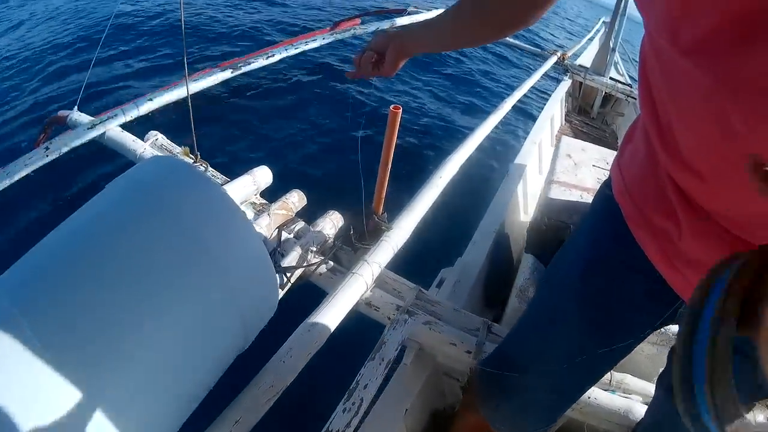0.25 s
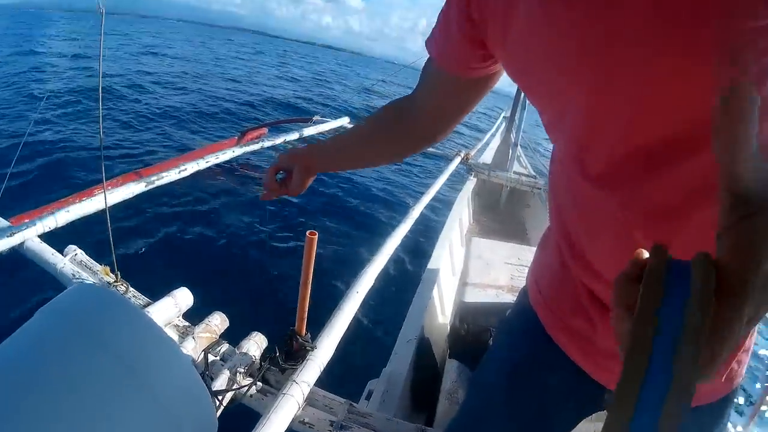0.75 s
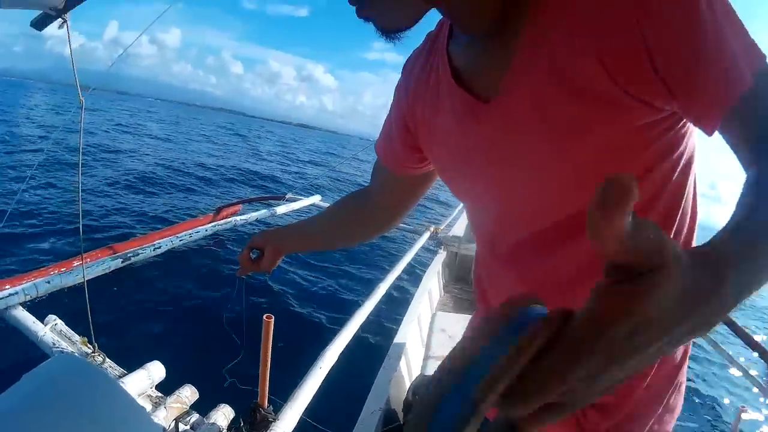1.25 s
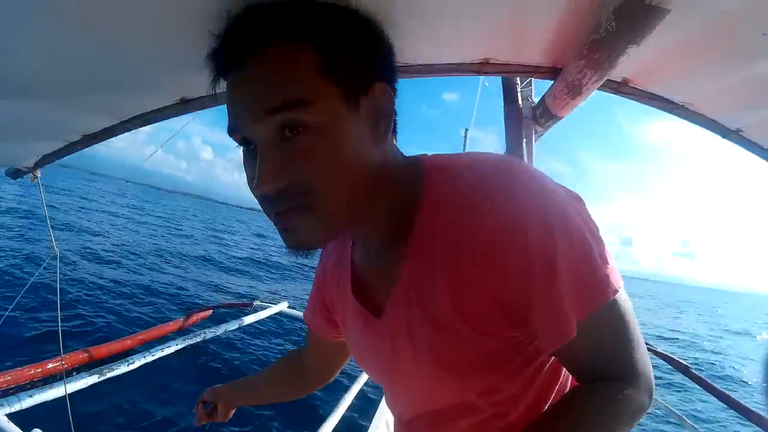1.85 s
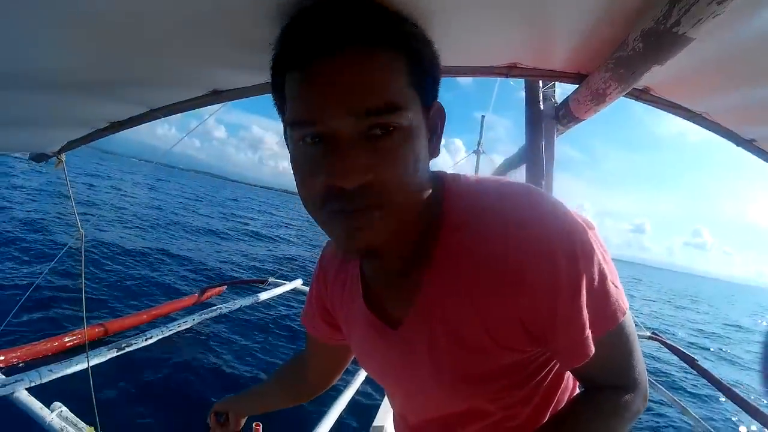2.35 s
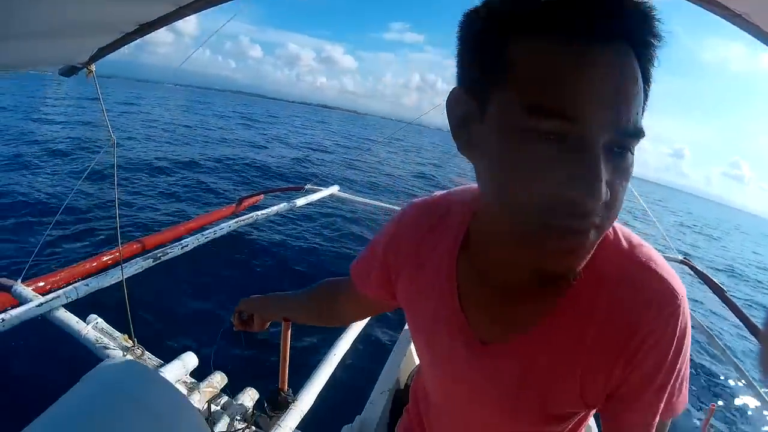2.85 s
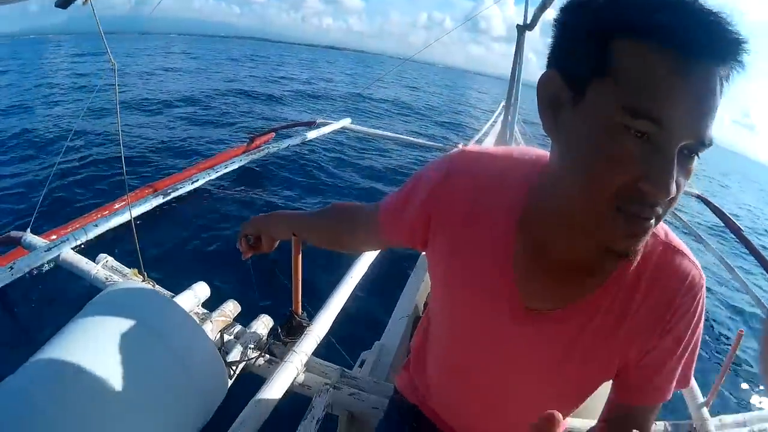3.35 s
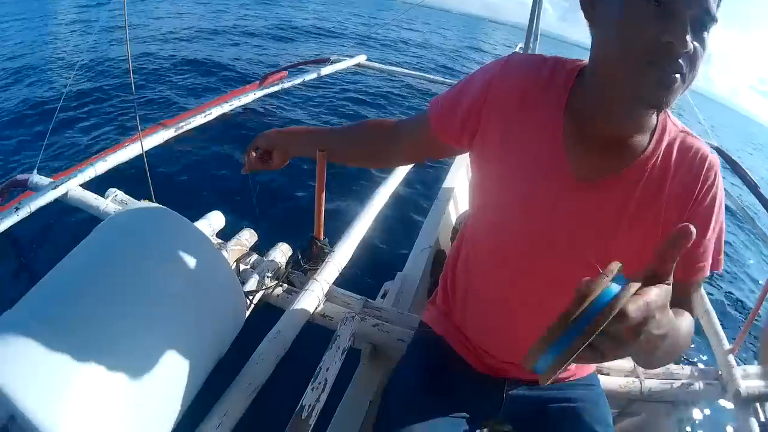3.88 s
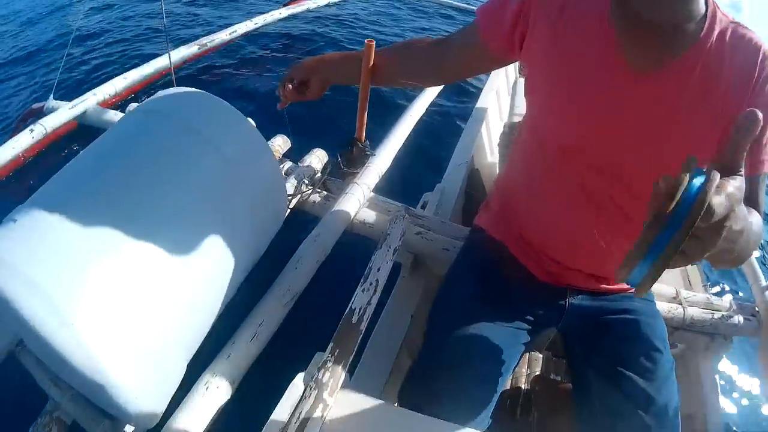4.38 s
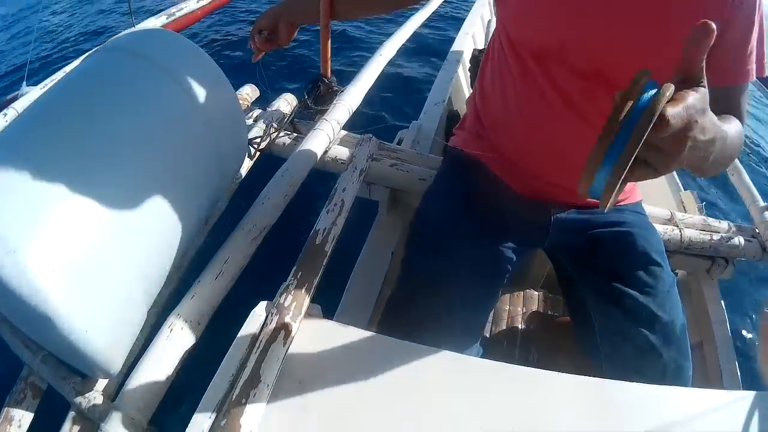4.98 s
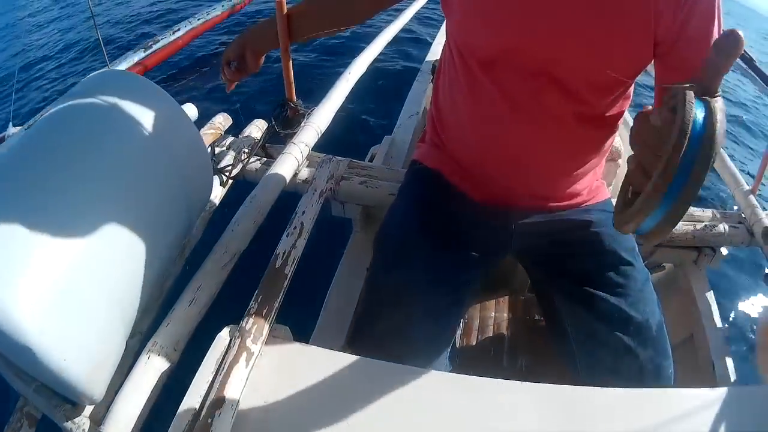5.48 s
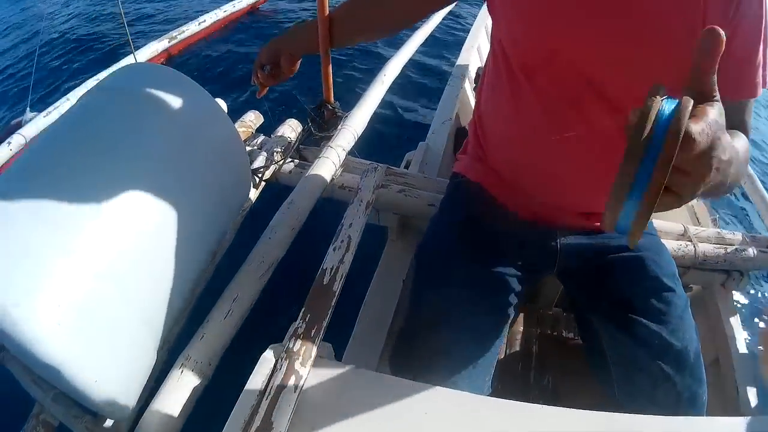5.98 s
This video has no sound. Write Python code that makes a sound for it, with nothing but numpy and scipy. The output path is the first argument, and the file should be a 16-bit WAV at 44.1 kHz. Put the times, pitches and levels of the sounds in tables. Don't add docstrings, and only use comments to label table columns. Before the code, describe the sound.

Wavelets slap and gurgle against a small wooden boat at sea, with two sharp knocks right beside the microphone early on.

```python
import sys
import numpy as np
from scipy import signal
from scipy.fft import rfft, irfft
from scipy.io import wavfile

SR = 44100
rng = np.random.default_rng(int(sys.argv[2]) if len(sys.argv) > 2 else 0)


def master_out(mix):
    frames = np.transpose(np.atleast_2d(mix))
    ceiling = np.clip(frames, -1, 1)
    pcm = np.round(ceiling * 32767).astype(np.int16)
    wavfile.write(sys.argv[1], SR, pcm)


def boost(x):
    u = np.asarray(x, float) / 20
    return 10 ** u


N = 274743


def rms_one(x):
    return x / np.sqrt(np.mean(x ** 2) + 1e-20)


def background():
    # (frequency [Hz], level [dB per Hz])
    density = [(12, -37), (20, -1.5), (116, -1), (172, -3), (337, -8), (607, -13), (923, -15),
               (1370, -18.5), (1910, -19), (3160, -22), (14300, -22.5), (16000, -27.5)]
    # (time [s], rumble level [dB])
    heave = [(0, -73), (1.25, -71.5), (1.8, -76.5), (2.4, -73.5), (3.5, -75.5), (5.47, -72), (6.23, -74.5)]
    crossover_hz, hiss_db = 200, -69.5
    hz = np.fft.rfftfreq(N, 1 / SR) + 1
    density_hz, density_db = np.transpose(density)
    colour = boost(np.interp(np.log(hz), np.log(density_hz), density_db))
    noise = rfft(rng.standard_normal(N)) * colour
    low_share = 1 / (1 + (hz / crossover_hz) ** 2)
    heave_db = np.interp(np.arange(N) / SR, *np.transpose(heave))
    rumble = rms_one(irfft(noise * low_share, N)) * boost(heave_db)
    hiss = rms_one(irfft(noise * (1 - low_share), N)) * boost(hiss_db)
    return rumble + hiss


def drift(rate_hz):
    step = 40
    r = np.exp(-2 * np.pi * step * rate_hz / SR)
    settle = 2000
    noise = rng.standard_normal(N // step + settle + 2)
    slow = signal.lfilter([1], [1, -2 * r, r * r], noise)[settle:]
    return np.interp(np.arange(N) / step, np.arange(len(slow)), rms_one(slow))


def grains(per_s, spread_db):
    size_db = spread_db * np.minimum(rng.exponential(1, N), 4)
    sizes = boost(size_db) * rng.choice([-1, 1], N)
    return rms_one(sizes * (rng.random(N) < per_s / SR))


def resonances(x, modes, favour_db):
    out = 0
    for k, (hz, width_hz, level_db) in enumerate(modes):
        r = np.exp(-np.pi * width_hz / SR)
        poles = [1, -2 * r * np.cos(2 * np.pi * hz / SR), r * r]
        zeros = [(1 - r * r) / 2, 0, (r * r - 1) / 2]
        drive = x * boost(level_db + favour_db * drift(40))
        sign = (-1) ** k
        out = out + sign * signal.lfilter(zeros, poles, drive + 1e-18)
    return out


def bodies(drops, thump, middle, spray, favour_db):
    # (frequency [Hz], width [Hz], level [dB])
    plank_modes = [(165.46, 28, 2), (302, 130, 0), (430.4, 240, 0.5), (610, 150, 2.5), (830, 247, -4)]
    # (frequency [Hz], width [Hz], level [dB])
    housing_modes = [(1100, 300, -4), (1580, 540, 1.5), (1850, 250, 4), (2300, 410, -2), (2700, 280, 0),
                     (3340, 870, -7.5)]
    # (frequency [Hz], width [Hz], level [dB])
    spray_modes = [(4400, 940, 1), (5060, 800, 1.5), (6455, 1800, -4), (9100, 3000, -6.5),
                   (12084, 3000, -8), (15000, 2700, -12.5)]
    planks = resonances(drops * thump, plank_modes, favour_db)
    housing = resonances(drops * middle, housing_modes, favour_db)
    return planks + housing + resonances(drops * spray, spray_modes, favour_db)


def lapping():
    # (time [s], fine lapping level [dB])
    restlessness = [(0, -83), (.15, -73.5), (.5, -85.5), (.94, -72.5), (1.28, -85), (1.561, -94),
                    (1.9, -88), (3.2, -76.5), (3.4, -86), (4.08, -77), (4.76, -77), (5.47, -77),
                    (5.66, -81.5), (5.97, -79), (6.12, -86), (6.23, -78)]
    slosh_db, slosh_follows, middling_db = -77.5, 1.4, -78.5
    fine_db = np.interp(np.arange(N) / SR, *np.transpose(restlessness))
    fine = boost(fine_db - 2 + 3 * drift(12))
    slosh = boost(slosh_db + slosh_follows * (fine_db - middling_db) + 2 * drift(8))
    drops = grains(2000, spread_db=4) * boost(6.5)
    return bodies(drops, slosh, fine, fine * boost(-4), favour_db=4)


def slaps():
    # (time [s], peak level [dB])
    pats = [(.0014, -51.5), (.064, -53), (0.111, -66), (0.195, -63), (.2089, -55), (0.5332, -58),
            (.9163, -66), (1.5946, -61), (3.3794, -64), (3.772, -60), (3.865, -45.5), (3.939, -56),
            (3.9885, -57.5), (4.0183, -54.5), (4.484, -63), (4.5236, -53), (5.2695, -61), (5.817, -49.5),
            (6.18, -61)]
    # (time [s], peak level [dB])
    splashes = [
        (0.047, -49),
        (0.0737, -42.5),
        (.253, -65),
        (0.8005, -61),
        (0.8397, -62),
        (3.623, -57.5),
        (4.4566, -66),
        (4.9871, -60.5),
        (5.4243, -49),
        (5.493, -56),
    ]
    # (time [s], peak level [dB])
    full_slaps = [(0.0871, -49.5), (.2334, -55), (0.3243, -61), (0.4912, -62), (2.0408, -66),
                  (3.8464, -52.5), (4.2097, -56.5), (4.4391, -62), (4.5994, -66), (5.4303, -48),
                  (5.6556, -50.5), (5.7524, -61.5), (5.789, -65)]
    # (time [s], peak level [dB])
    flicks = [(0.1231, -61), (0.179, -71), (0.4856, -69), (.988, -72), (1.068, -71.5), (1.1344, -71.5),
              (4.1, -68.5), (4.6, -75), (5.414, -58), (5.4813, -60), (5.708, -71.5), (6.2086, -69)]
    # (time [s], peak level [dB])
    slops = [
        (0.8617, -71),
        (1.198, -73),
        (2.156, -74),
        (4.1133, -55),
        (4.2254, -60),
        (4.246, -63),
        (5.5153, -64),
        (5.8413, -62),
    ]
    # (hull thump re peak [dB], spray re peak [dB], decay time t60 [s])
    kinds = [
        (-15, -18, 0.042),
        (-30, 0, 0.091),
        (-5, -4, 0.068),
        (-4, 13, 0.059),
        (9, 0, 0.041),
    ]
    rise_s = 0.0015
    decay_stretch = np.array([[1.4], [1], [0.65]])
    levels = np.zeros((3, N))
    drops = grains(4300, spread_db=4)
    for wavelets, (thump_db, spray_db, t60) in zip((pats, splashes, full_slaps, flicks, slops), kinds):
        balance_db = 6 + np.array([[thump_db + 4.5], [0], [spray_db - 2]])
        for s, peak_db in wavelets:
            start = round(s * SR)
            t = np.arange(min(round(0.2 * SR), N - start)) / SR
            shape = (1 - np.exp(-t / rise_s)) * boost(-60 * t / (t60 * decay_stretch))
            levels[:, start:start + len(t)] += boost(peak_db + balance_db) * shape
            drops[start + 40] = 15
    return bodies(drops, *levels, favour_db=2.5)


def pockets():
    # (time [s], peak level [dB], pitch [Hz], hold [s])
    plain = [(.002, -56, 1020, .0057), (.083, -54, 1516, 0.011), (.165, -64, 1710, 0.0056),
             (.213, -57.5, 1356, .0057), (.236, -65, 473, 0.0059), (.801, -54, 1750, 0.007),
             (.826, -67, 1320, .006), (.855, -65, 860, 0.0093), (.884, -66, 1500, .01),
             (.31, -70.5, 1100, 0.015), (1.198, -59, 595, 0.013), (1.205, -60, 289.9, 0.0092),
             (2.155, -63, 900, .0056), (3.769, -58, 1605, .0055), (3.905, -64, 740, .02),
             (4.377, -63.5, 1100, 0.016), (4.458, -62, 967, .01), (4.482, -62, 1900, .003),
             (4.533, -67, 856, 0.018), (4.763, -49, 1850, 0.0038), (5.282, -65, 1940, .011),
             (5.422, -56, 1845, .005), (5.437, -66, 708, 0.012), (5.514, -56.5, 744, 0.0091),
             (5.812, -62, 1850, 0.015), (5.842, -52.5, 1806, 0.0041), (5.894, -69.5, 1010, 0.03),
             (6.18, -65.5, 1150, .008), (6.198, -63, 1780, 0.009), (6.215, -66, 1050, 0.0086)]
    # (time [s], peak level [dB], pitch [Hz])
    pings = [(.111, -62, 2250), (.251, -63, 2310), (.916, -63, 2330), (.987, -66, 4830), (2.125, -59, 8260),
             (3.637, -73, 2130), (3.849, -58, 4400), (3.851, -61, 4780), (3.868, -67, 4700),
             (3.939, -59.5, 2120), (4.02, -72, 2140), (4.063, -67, 4600), (4.116, -60.5, 4970),
             (4.123, -64, 2700), (4.632, -70, 1000), (4.778, -68, 1860), (4.799, -67.5, 1980),
             (4.463, -66, 5000), (4.53, -70, 4900), (5.162, -63, 5230), (5.268, -62.5, 2700),
             (5.707, -69, 4400), (5.427, -51.5, 5230), (5.428, -50, 2700), (5.953, -69, 2545),
             (6.175, -58, 2780), (6.206, -59.5, 4670)]
    # (time [s], peak level [dB], pitch [Hz], hold [s], pitch rise over hold [share])
    gulp = [
        (4.2103, -42.5, 817, .0207, .026),
        (4.211, -62, 1600, .011, .03),
        (4.212, -63, 2860, .0061, .018),
        (4.232, -50, 740, .016, .3),
        (4.246, -58, 1480, .01, .06),
        (4.249, -55, 950, .009, .05),
        (4.26, -46, 1050, .0162, .66),
        (4.277, -60, 1950, .007, .17),
        (4.28, -52, 1740, .005, .02),
        (4.288, -56, 1860, .009, .3),
    ]
    # (time [s], peak level [dB], pitch [Hz], hold [s], pitch rise over hold [share])
    gurgles = [
        (4.16, -64.5, 1048, 0.0185, .25),
        (5.662, -66, 395, 0.034, .05),
        (5.732, -61.5, 361, 0.053, 0.4),
        (5.814, -58, 412, 0.017, 0.11),
        (5.84, -69, 533, .02, 0.32),
    ]
    hold_cycles, slight_rise = 13.4, 0.0083
    simple = list(plain) + [(s, db, hz, hold_cycles / hz) for s, db, hz in pings]
    rows = []
    for s, db, hz, hold in simple:
        t60 = 0.039 * (1000 / hz) ** 0.72
        rows.append((s, db, hz, hold, t60, slight_rise))
    for risers, t60 in ((gulp, 0.0075), (gurgles, 0.03)):
        rows += [(s, db, hz, hold, t60, rise) for s, db, hz, hold, rise in risers]
    return rows


def bubbles():
    attack_s, steady_db = 0.00053, -51.5
    out, wobble = np.zeros(N), drift(190)
    for s, peak_db, hz, hold, t60, rise in pockets():
        start = round(s * SR)
        t = np.arange(min(round(0.12 * SR), N - start)) / SR
        steady = peak_db > steady_db and rise < 0.05
        shake = (0.5 + 0.3 * rise - 0.5 * steady) * wobble[start:start + len(t)]
        pitch = hz * (1 + rise * np.minimum(t / hold, 1.5) + 0.058 * shake)
        swell_db = -(3 + 8 * rise) * np.maximum(1 - t / hold, 0)
        burst_db = -60 * np.maximum(t - hold, 0) / t60
        shape = (1 - np.exp(-t / attack_s)) * boost(peak_db + swell_db + burst_db + 3.6 * shake)
        cycles = np.cumsum(pitch) / SR + rng.random()
        out[start:start + len(t)] += shape * np.sin(2 * np.pi * cycles)
    return out


def swashes():
    # (time of crest [s], level [dB], hull thump re level [dB], half length [s])
    crests = [(.01, -69, 7, .02), (0.073, -56.5, -3.5, 0.031), (0.211, -67.5, -3, 0.015),
              (0.486, -73.5, 3, 0.068), (0.864, -67, -7, 0.051), (1.208, -75, 17.5, 0.0093),
              (1.242, -79, 17, 0.021), (2.034, -74.5, 1, 0.028), (2.68, -74, -10, .025),
              (2.95, -79, -6, 0.046), (3.361, -73, -10, 0.03), (3.684, -73.5, 11.5, .011),
              (3.792, -74, -2, .015), (3.892, -71, 2, 0.032), (3.99, -81, -4, .02), (4.084, -77, 11, 0.039),
              (4.13, -65, 8.5, 0.016), (4.268, -71, 9.5, .0084), (4.298, -66, 5, 0.012),
              (4.459, -75, 0, .02), (4.529, -71.5, 7, 0.03), (4.604, -78, -7, 0.019),
              (5.438, -58.5, -2, 0.013), (5.515, -61.5, 2.5, .019), (5.668, -73.5, 9, 0.031),
              (5.78, -66.5, 2, 0.036), (5.849, -70.5, 8.5, 0.029), (6.214, -68.5, -9, 0.015)]
    spray_db = -8.5
    levels, t = np.zeros((3, N)), np.arange(N) / SR
    for s, crest_db, thump_db, half in crests:
        near = slice(max(round((s - 3 * half) * SR), 0), round((s + 3 * half) * SR))
        shape = np.exp(-0.5 * ((t[near] - s) / half) ** 2)
        levels[:, near] += boost(crest_db + np.array([[thump_db], [0], [spray_db]])) * shape
    drops = grains(9000, spread_db=2) * boost(8.5 + 1.8 * drift(66))
    return bodies(drops, *levels, favour_db=2.4)


def blow(hit, modes):
    s, level_db, contact_s = hit
    t = np.arange(round(0.03 * SR)) / SR
    ringing = 0
    for hz, height, t60 in modes:
        ringing = ringing + height * boost(-60 * t / t60) * np.sin(2 * np.pi * hz * t)
    start = round(s * SR) - 100
    force = np.exp(-abs(np.arange(256) + start - s * SR) / (contact_s * SR))
    sound = np.convolve(ringing, force / force.sum())
    out = np.zeros(N)
    out[start:start + len(sound)] = boost(level_db) * sound
    no_bass = signal.butter(2, 150, "high", fs=SR, output="sos")
    return signal.sosfilt(no_bass, out + 1e-18)


def knocks():
    # (time [s], level [dB], contact time [s])
    lean_hit = (1.307465, 0, .000198)
    tick_hit = (1.307712, 0, .0000229)
    knock_hit = (1.5276, 0, .000129)
    # (frequency [Hz], signed height [linear], decay time t60 [s])
    lean_modes = [(908, -.27, .0027), (2318, -.45, .0114), (4855, 2.28, .009), (7443, 6.7, .006),
                  (10970, -10, .006)]
    tick_modes = [(810, .038, .0047), (1956, .234, .0032), (2480, -.217, .006), (3150, -.22, .0015),
                  (4547, -.075, .0077), (5517, -.346, .0054), (6149, -1.43, .0033), (6778, .97, .0024),
                  (7985, .25, .005), (10600, .55, .0025), (12450, -.6, .0015), (13770, -.26, .0033),
                  (16500, .055, .008)]
    knock_modes = [(517, .66, .0019), (935, .045, .0075), (1880, .04, .02), (2061, -2.25, .0022),
                   (2466, .3, .0126), (3220, 1.2, .0015), (4504, -1.38, .0027), (5557, 1.13, .0025),
                   (8760, -.9, .0017), (11980, .9, .0042), (13900, -.5, .003), (15200, .8, .003)]
    return blow(lean_hit, lean_modes) + blow(tick_hit, tick_modes) + blow(knock_hit, knock_modes)


def scene():
    water = lapping() + slaps() + bubbles() + swashes()
    return (background() + water + knocks())[None]


def low_pass(x):
    return signal.sosfilt(signal.butter(12, 16850, fs=SR, output="sos"), x)


def record(dry):
    steep = signal.cheby2(10, 60, 17200, fs=SR, output="sos")
    mix = signal.sosfilt(steep, dry)
    return low_pass(mix)


dry = scene()
out = record(dry)
master_out(out)
```